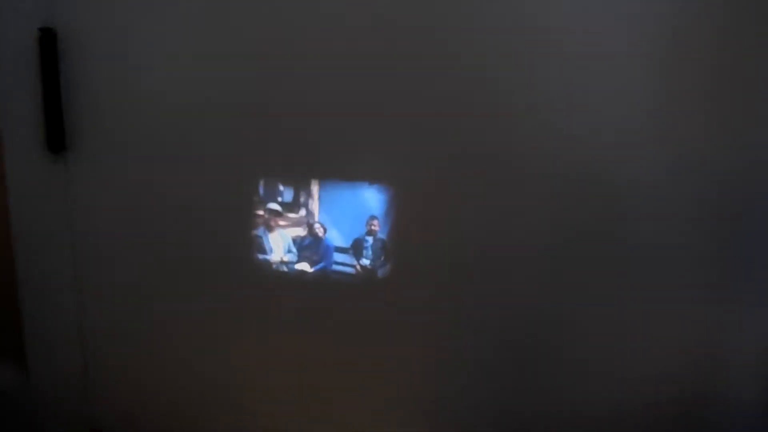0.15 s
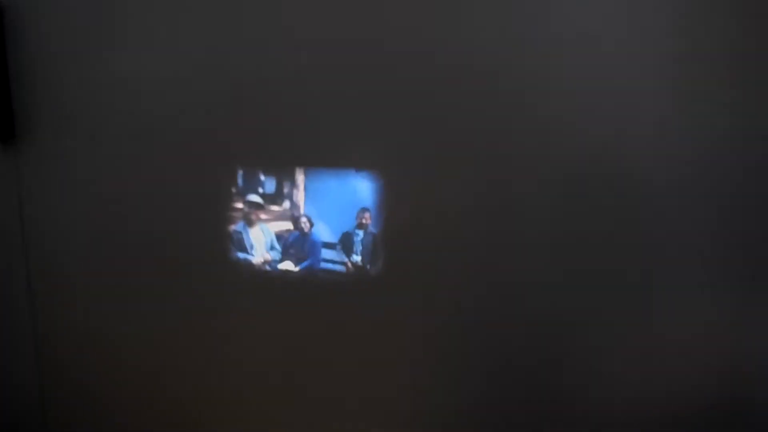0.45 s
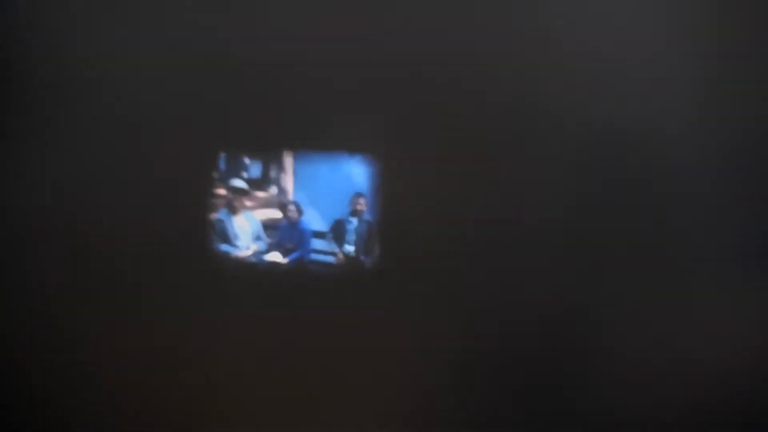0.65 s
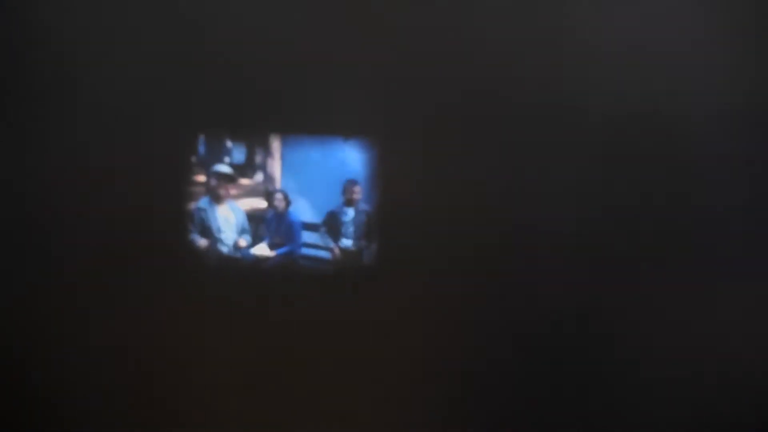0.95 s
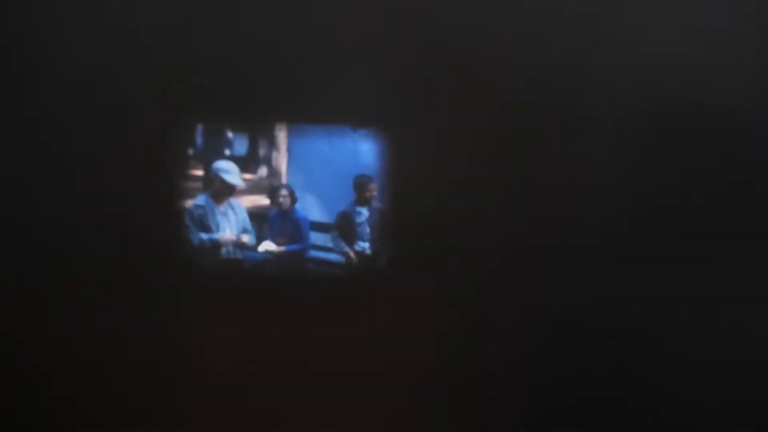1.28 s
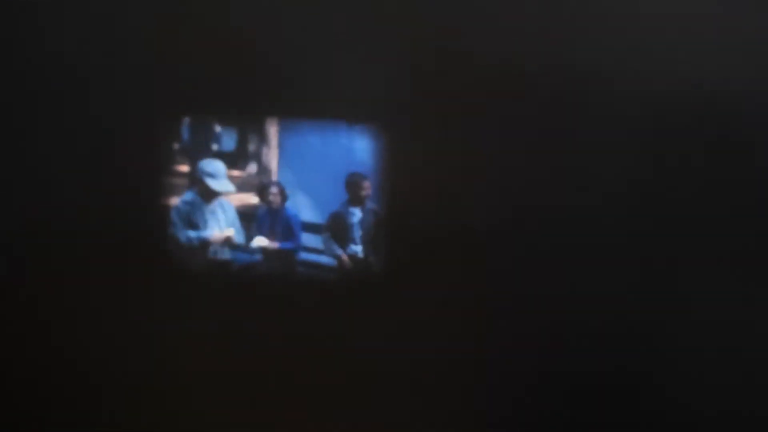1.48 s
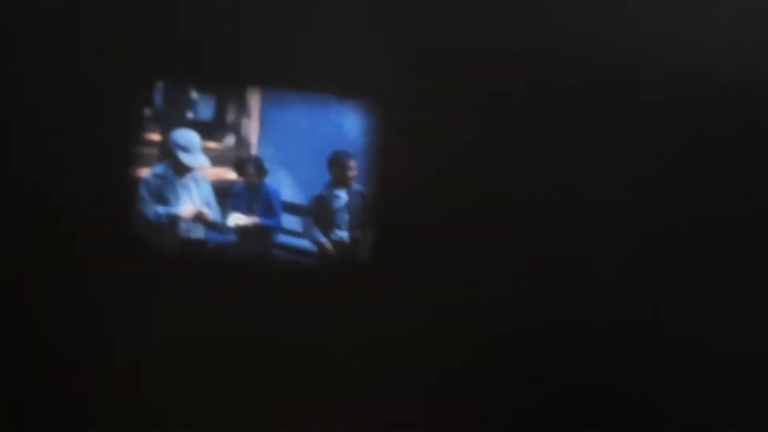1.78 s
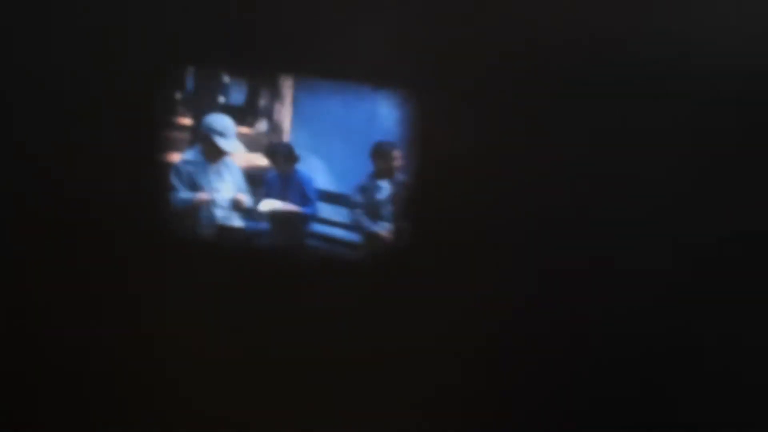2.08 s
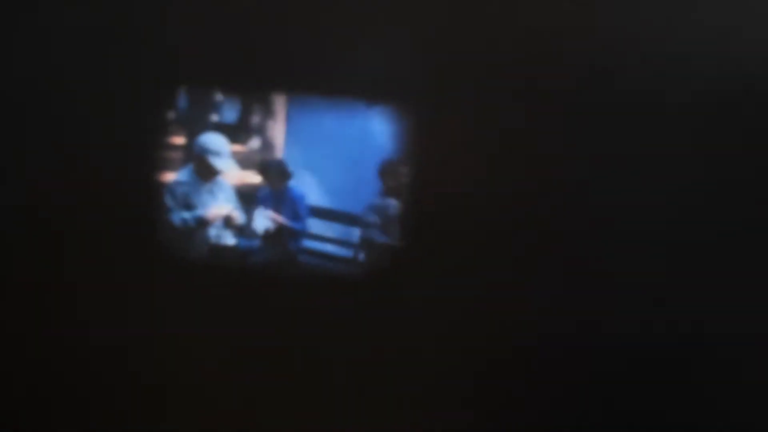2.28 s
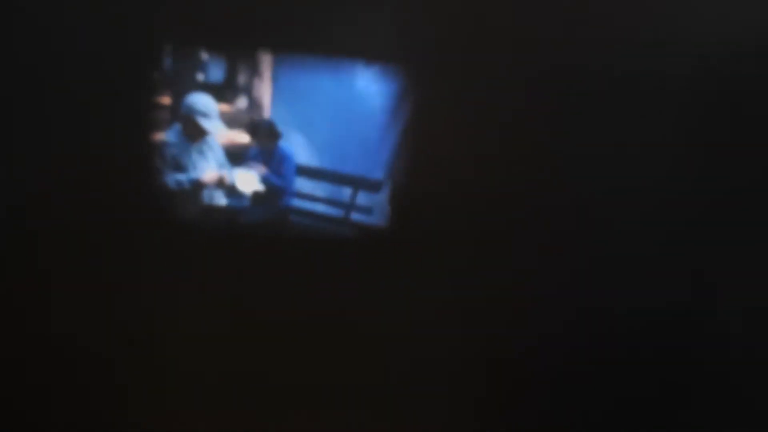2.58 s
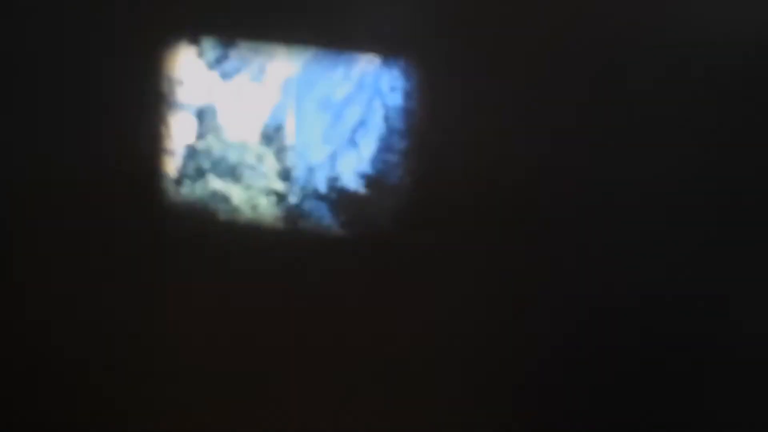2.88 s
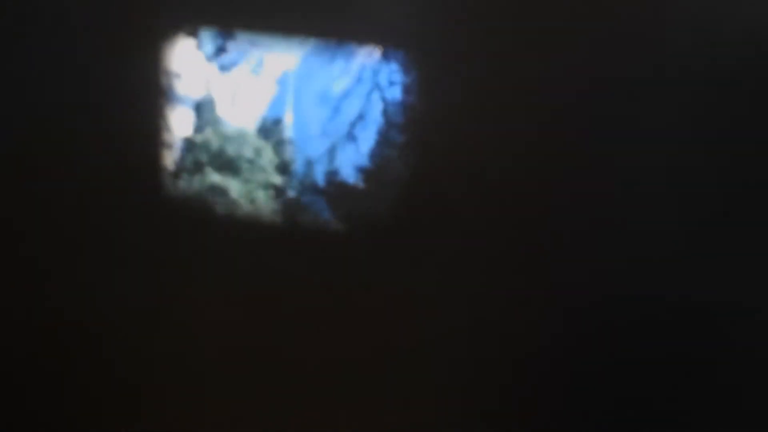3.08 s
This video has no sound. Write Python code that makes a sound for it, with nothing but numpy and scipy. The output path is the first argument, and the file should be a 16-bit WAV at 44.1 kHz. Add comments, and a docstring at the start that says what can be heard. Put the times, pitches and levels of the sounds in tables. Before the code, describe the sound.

A small film projector clatters rapidly in a small room, with rasping film, fan noise, a thin metallic whine and light ticks. Slightly muffled at first, the sound suddenly gains bright hiss and a low wavering hum.

```python
"""The claw of a small film projector knocks its housing about 13.5 times a second in a small room.
Each stroke excites the housing's resonances and drags the film through the gate with a rasp of friction.
Two metal parts sing, a loose one ticks and the reel brushes the film, over fan noise and a wavering hum.
The sound is muffled at first; after about two seconds its bass and treble open up at once."""
import sys
import numpy as np
from scipy import signal
from scipy.fft import rfft, irfft
from scipy.io import wavfile
from scipy.ndimage import uniform_filter1d

SR = 44100
rng = np.random.default_rng(int(sys.argv[2]) if len(sys.argv) > 2 else 0)


def generate_wav(sig):
    """Save sig (samples, or channels by samples) to the path in sys.argv[1] as 16-bit PCM at SR."""
    pcm = np.round(np.clip(np.atleast_2d(sig).T, -1, 1) * 32767).astype(np.int16)
    wavfile.write(sys.argv[1], SR, pcm)


N = 142884
TIME = np.arange(N) / SR
FFT_SIZE = 2 ** 18
HZ = np.fft.rfftfreq(FFT_SIZE, 1 / SR)
SHAFT, REEL = (19.73, .014), (5.27, .168)  # turns_per_s, first_peak_s

# Hard clacks of the claw: time_s, accent_db
HARD_CLACKS = [(.229, 2), (0.306, 3), (0.452, 3.5), (.601, 4), (.676, 1.5), (0.824, 1), (1.121, 0.5),
               (1.27, -0.5), (1.346, 2), (1.421, 1), (1.573, 1), (2.158, 2), (2.537, -1.5), (2.828, 3),
               (3.129, 0)]


def amp(db):
    """Amplitude ratio of a level in decibels."""
    return 10 ** (np.asarray(db) / 20)


def unit(x):
    """Normalisation to an rms of 1."""
    return x / np.sqrt(np.mean(x ** 2) + 1e-20)


def curve(points):
    """A gain curve, interpolated over logarithmic frequency."""
    hz, db = np.transpose(points)
    return np.interp(np.log(HZ + 1), np.log(hz), db)


def colour(x, db):
    """Minimum-phase filtering: folding the cepstrum makes the gain curve causal."""
    cepstrum = irfft(np.log(amp(db)))
    cepstrum[1:FFT_SIZE // 2] *= 2
    cepstrum[FFT_SIZE // 2 + 1:] = 0
    return irfft(rfft(x, FFT_SIZE) * np.exp(rfft(cepstrum)))[..., :N]


def stereo(pair):
    """Mid-side mixing of two unrelated signals: coherent bass, wide treble, rms 1."""
    # Side relative to mid: frequency_hz, gain_db
    side_gain = [(25, -52), (60, -57), (125, -23), (270, -88), (500, -9), (800, -12.5), (1200, -6),
                 (2100, -4.5), (3100, 1), (4500, 2.5), (6800, -.5), (9000, -3.5), (14000, -1)]
    # Left relative to right: frequency_hz, gain_db
    balance = [(600, -1.1), (1200, -1.7), (2200, -2.5), (4500, 0.5), (8000, 0.5), (13000, 1)]
    width = amp(curve(side_gain))
    mid, side = rfft(pair, FFT_SIZE) * np.array([np.ones_like(width), width]) / np.hypot(1, width)
    lean = amp(curve(balance) / 2 * np.clip(HZ / 300 - 1, 0, 1))  # centred below 300 Hz
    return unit(irfft(np.array([(mid + side) * lean, (mid - side) / lean]))[:, :N])


def drift(rate_hz):
    """Random modulation: low-passed noise of rms 1."""
    return unit(irfft(rfft(rng.standard_normal(FFT_SIZE)) * np.exp(-(HZ / rate_hz) ** 2))[:N])


def turning(turns_per_s, first_peak_s):
    """Periodic modulation by a rotating part, from -1 to 1."""
    return np.cos(2 * np.pi * turns_per_s * (TIME - first_peak_s))


def ripple():
    """Interference of reflections, as random low peaks and deeper dips in a spectrum, in dB."""
    depth_db, spacing_hz = 6.5, 49
    knots_hz = np.arange(0, SR / 2, spacing_hz)
    heights = np.minimum(rng.standard_normal(4096), 1)
    return depth_db * np.interp(HZ, knots_hz, heights[:len(knots_hz)])


def room_response():
    """Impulse response: a short crack and a reverberant tail, with a nearly flat spectrum."""
    crack_s, t60_s, tail_db = .0036, .136, 2.5
    t = np.arange(8192) / SR
    crack, tail = unit(np.exp(-t / crack_s)), unit(amp(-60 * t / t60_s))
    envelope = np.hypot(crack, amp(tail_db) * tail)
    response = rng.standard_normal((2, len(t))) * envelope
    for _ in range(4):  # whiten, then restore the decay
        response = irfft(np.exp(1j * np.angle(rfft(response))))
        power = abs(uniform_filter1d(response ** 2, size=200, axis=1))
        response *= envelope / np.sqrt(power + 1e-20)
    return response


def frame_times():
    """Quasi-periodic motion: the time of each claw stroke, in seconds."""
    # Wander of the drive: time_s, delay_s
    wander = [(0, -0.0056), (.55, -0.007), (1.35, -0.0024), (2.15, -0.0053), (2.6, -.0042), (3.24, -0.0082)]
    first_s, period_s = .0078, .074242
    steady = first_s + period_s * np.arange(int(N / SR / period_s) + 1)
    return steady + np.interp(steady, *np.transpose(wander))


def strokes(lead_s, rise_s, hold_s, fade_s):
    """Amplitude envelope of each frame: linear attack, hold and exponential decay."""
    starts = frame_times() - lead_s
    age = TIME - starts[np.maximum(np.searchsorted(starts, TIME) - 1, 0)]
    return np.clip(age / rise_s, 0, 1) * np.exp(-np.maximum(age - rise_s - hold_s, 0) / fade_s)


def accents():
    """Greater force raises the level: a Gaussian pulse at each hard clack."""
    return sum(db * np.exp(-((TIME - s) / .0055) ** 2) for s, db in HARD_CLACKS)


def grit():
    """Stick-slip excitation: sparse impulses mixed with the noise of smooth friction."""
    slips_per_s, share = 2500, .36
    slips = (rng.random(N) < slips_per_s / SR) * rng.standard_normal((2, N))
    return share * unit(slips) + (1 - share) * rng.standard_normal((2, N))


def hum():
    """Two low tones waver under random frequency and amplitude modulation."""
    # Course of the tones: time_s, lower_db, upper_db, upper_hz
    course = [(.5, -86, -80, 91.3), (0.849, -65, -63, 89.7), (1.299, -73, -72, 107), (1.698, -71, -64, 105),
              (1.9, -75, -61, 95.3), (2.148, -74, -63, 91.8), (2.24, -62.5, -70, 98.4),
              (2.32, -71, -56.5, 104.2), (2.4, -66, -68, 95), (2.49, -61, -54, 92.6), (2.59, -62, -67, 91),
              (2.67, -53, -60, 95.2), (2.81, -51, -73, 91.5), (2.92, -60.5, -68.5, 75.3),
              (3.02, -57, -62, 76), (3.12, -58.5, -55, 89.5), (3.24, -56.5, -67, 97)]
    times, *columns = np.transpose(course)
    lower_db, upper_db, upper_hz = (np.interp(TIME, times, column) for column in columns)
    out = np.zeros(N)
    for hz, db in ((59.5, lower_db), (upper_hz, upper_db)):
        cycles = np.cumsum(hz * (1 + .035 * drift(12.6))) / SR
        out += np.sqrt(2) * amp(db + 2 * drift(34)) * np.sin(2 * np.pi * cycles)
    return out


def fan():
    """Broadband noise of the fan and gears, with a slight random flutter in amplitude."""
    # Spectrum of the rush: frequency_hz, gain_db
    spectrum = [(20, -22), (55, -12), (100, -6.5), (155, -22.5), (215, -10.5), (270, -6), (410, 6),
                (720, -4.5), (880, -2.5), (1080, 12.5), (1420, -3), (2200, -2), (3100, -3), (4300, -4.5),
                (7500, -15), (13200, -20), (15500, -23)]
    air = rng.standard_normal((2, N)) * amp(drift(100))
    return amp(-38.5) * stereo(colour(air, curve(spectrum) + ripple() * np.minimum(HZ / 2500, 1)))


def reel():
    """Friction noise of the reel brushing the film swells once a turn."""
    # Spectrum of the brushing: frequency_hz, gain_db
    spectrum = [(2500, -24), (3700, -7), (4400, 11.5), (5300, -15), (7000, -3.5), (10800, 1.5),
                (13400, 6.5), (14400, 2), (15500, -5.5)]
    hiss = rng.standard_normal((2, N)) * amp(1.5 * turning(*REEL))
    return amp(-47) * stereo(colour(hiss, curve(spectrum) + ripple()))


def singing_metal():
    """Sustained vibration of two metal parts, modulated by the drive; the lower swells and bends up."""
    # Tones: pitch_hz, waver_hz, level_db, waver_db, claw_swing_db, shaft_swing_db, reel_swing_db
    tones = [(1135.6, 10.01, -41, 1.36, -1, 2, 0.5), (1214, 8.09, -47, 2.2, 4, 0, 3)]
    # Swells of the lower tone: time_s, bend_hz, lift_db
    swells = [(.005, 79.5, 3), (0.17, 84, 10), (.315, 79.5, 7), (.456, 70, 3), (.618, -0.5, 5),
              (.761, 78.5, 10), (.917, 15.5, 7.5), (1.059, 81, 4), (1.138, 70.5, 10), (1.431, 74.5, 7.5),
              (1.741, 17.5, 6), (1.856, 26, 2), (2.083, 17, 6.5), (2.156, 8, 7.5), (2.196, 86, 4),
              (2.249, 75, 3), (2.406, 83.5, 8), (2.487, 10.5, 5.5), (2.592, -0.5, 7), (2.692, 80.5, 4),
              (2.851, 10.5, 7.5)]
    lag_s, swell_s, bend_s, room_db = .0081, .016, .026, -12.5
    frames = frame_times()
    with_claw = np.cos(2 * np.pi * np.interp(TIME - lag_s, frames, np.arange(len(frames))))
    swell_db = sum(db * np.exp(-((TIME - s) / swell_s) ** 2) for s, _, db in swells)
    bend_hz = sum(hz * np.exp(-((TIME - s) / bend_s) ** 4) for s, hz, _ in swells)
    out = np.zeros(N)
    for (hz, waver_hz, db, waver_db, claw_db, shaft_db, reel_db), is_lower in zip(tones, (True, False)):
        drive_db = claw_db * with_claw + shaft_db * turning(*SHAFT) + reel_db * turning(*REEL)
        level_db = db + waver_db * drift(17) + drive_db + is_lower * swell_db
        pitch_hz = hz + waver_hz * drift(37) + is_lower * bend_hz
        out += amp(level_db) * np.sin(2 * np.pi * np.cumsum(pitch_hz) / SR)
    room = unit(signal.fftconvolve(out[None], room_response(), axes=1)[:, :N])
    return np.sqrt(2) * np.std(out) * unit(unit(out) + amp(room_db) * room)


def loose_part():
    """Light impacts of loose metal: damped noise bursts, a few clear and many faint at random."""
    # Clear ticks: start_s, level_db
    clear = [(.526, -36), (.904, -30.5), (1.267, -38), (1.571, -36), (1.859, -32.5), (2.485, -37),
             (2.582, -33), (3.202, -42)]
    # Spectrum of a tick: frequency_hz, gain_db
    spectrum = [(3400, -25), (4200, -8), (4600, -6), (4900, 3.5), (5300, -14), (9000, -20), (15000, -24)]
    faint_per_s, fade_s = 14, .0053
    draws = rng.random((int(faint_per_s * N / SR), 2))
    faint = [(when * N / SR, -39 - 6 * weakness) for when, weakness in draws]
    envelope = sum(amp(db) * (TIME >= s) * np.exp(-abs(TIME - s) / fade_s) for s, db in clear + faint)
    return envelope * stereo(colour(rng.standard_normal((2, N)), curve(spectrum)))


def gate_pings():
    """Free vibration: each hard clack rings one damped mode of the metal gate."""
    pitch_hz, level_db, t60_s, lead_s = 2045, -35.5, .053, .00301
    t, out = np.arange(4096) / SR, np.zeros((2, N))
    for (s, db), phases in zip(HARD_CLACKS, rng.random((len(HARD_CLACKS), 2, 1))):
        ring = np.sin(2 * np.pi * (pitch_hz * t + phases)) * amp(level_db + db - 60 * t / t60_s)
        start = round((s - lead_s) * SR)
        out[:, start:start + len(t)] += ring[:, :N - start]
    return out


def film():
    """Sliding friction: the film rasps as the claw catches it, then hisses through the gate."""
    # Spectrum of the rasp: frequency_hz, gain_db
    rasp_spectrum = [(400, -20.5), (750, -14), (950, -44), (1500, -9), (2200, 2.5), (3100, -8.5),
                     (4300, -5), (6000, -25.5), (8000, -23), (15500, -25)]
    # Spectrum of the sliding hiss: frequency_hz, gain_db
    hiss_spectrum = [(1000, -40), (4000, -11), (6000, -5), (8000, -2), (10500, -0.5), (13200, 1),
                     (15500, -5.5)]
    catch = strokes(lead_s=.0082, rise_s=.0084, hold_s=.0087, fade_s=.024)
    catch *= amp(accents() + 2 * turning(*SHAFT))
    slide = strokes(lead_s=.009, rise_s=.013, hold_s=.0095, fade_s=.019)
    slide *= amp(2 * drift(250) + turning(*REEL))
    rasp = stereo(colour(grit() * catch, curve(rasp_spectrum) + ripple() * np.minimum(HZ / 2500, 1)))
    hiss = stereo(colour(grit() * slide, curve(hiss_spectrum) + .5 * ripple()))
    return amp(-41) * rasp + amp(-46.5) * hiss


def claw():
    """Impact excitation: six knocks a frame ring the resonances of the housing."""
    # Knocks of one cycle: delay_s, level_db, scatter_s, tilt_db_per_octave
    knocks = [(-.0055, -10, 0.0009, 1), (-.001, -0.5, .0004, -0.5), (.0035, -6.5, 0.0011, 2),
              (.0115, -2, .0006, -1), (.022, -11, .0016, -2), (.044, -11.5, 0.0011, -4)]
    # Broad response of the housing: frequency_hz, gain_db
    housing = [(60, -50.5), (170, -29), (300, -19.5), (400, -6.5), (560, -4), (740, 0), (900, -15),
               (1100, -3.5), (1450, -9.5), (2100, -13), (3000, -18), (4300, -13.5), (7000, -25.5),
               (14000, -66)]
    # Resonances of the housing: centre_hz, width_hz, lift_db
    modes = [(395, 5.3, 1), (418.3, 33.6, 9.5), (456.7, 4.4, 13), (554, 13.3, 9), (640, 48, 2.5),
             (709.4, 13.5, 6), (768, 6.3, 10), (1681, 92, 10), (2086, 93, 12)]
    peaks_db = sum(db / (1 + (2 * (HZ - hz) / width) ** 2) for hz, width, db in modes)
    body_db = curve(housing) + peaks_db
    octaves = np.log2(np.clip(HZ, 250, 4000) / 700)
    frames, out = frame_times(), np.zeros((2, N))
    for delay_s, db, scatter_s, tilt in knocks:
        times = frames + delay_s + scatter_s * rng.standard_normal(len(frames))
        at = np.round(times * SR).astype(int)
        blows = np.bincount(at[(at >= 0) & (at < N)], minlength=N) * amp(db)
        cracks = signal.fftconvolve(blows[None], room_response(), axes=1)[:, :N]
        out += colour(cracks, body_db + tilt * octaves)
    return amp(-35) * stereo(out * amp(.75 * accents()))


def scene():
    """Superposition of all the projector's sources."""
    # Slow swell of the claw and film: time_s, gain_db
    swell = [(0, -1), (1.5, 0), (2.1, 2.25), (2.4, -1), (3.24, -1.56)]
    clatter = amp(np.interp(TIME, *np.transpose(swell))) * (claw() + film())
    return clatter + gate_pings() + loose_part() + singing_metal() + reel() + fan() + hum()


def low_pass(x, hz):
    """Steep band limiting by a windowed-sinc filter."""
    return signal.oaconvolve(x, signal.firwin(401, hz, window=("kaiser", 8), fs=SR)[None], "same")


def record(dry):
    """A fast crossfade between two filters opens the muffled sound in bass and treble."""
    # Lift once the sound opens: frequency_hz, gain_db
    lift = [(25, 25.6), (60, 11.1), (125, 13), (250, 9.5), (500, 3.9), (1100, 0.49), (2100, 2.2),
            (4200, 6.65), (8000, 11.24), (13000, 17.6), (15500, 20.5)]
    open_s, ramp_s = 2.23, .01
    opened = np.clip((TIME - open_s) / ramp_s, 0, 1)
    mix = (1 - opened) * low_pass(dry, hz=14900) + opened * colour(dry, curve(lift))
    return low_pass(mix, hz=15900)


dry = scene()
out = record(dry)
generate_wav(out)
```